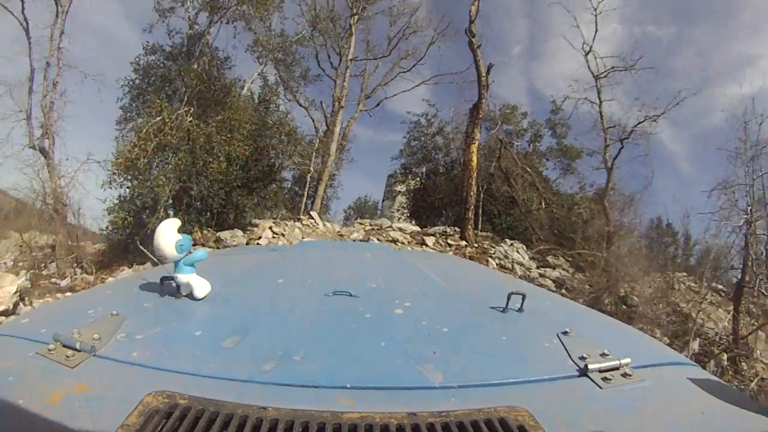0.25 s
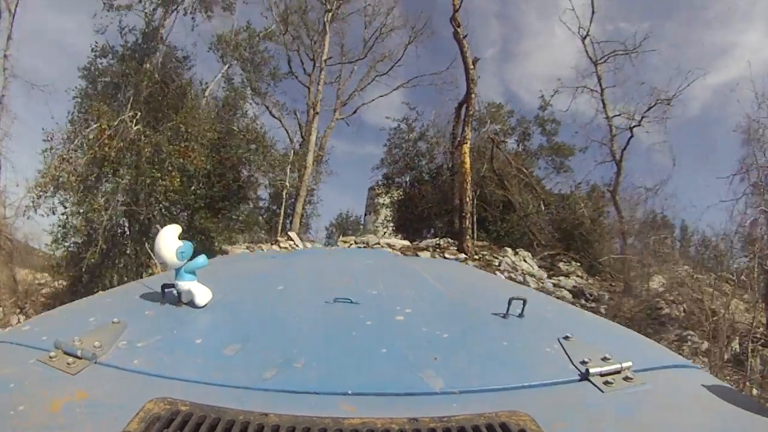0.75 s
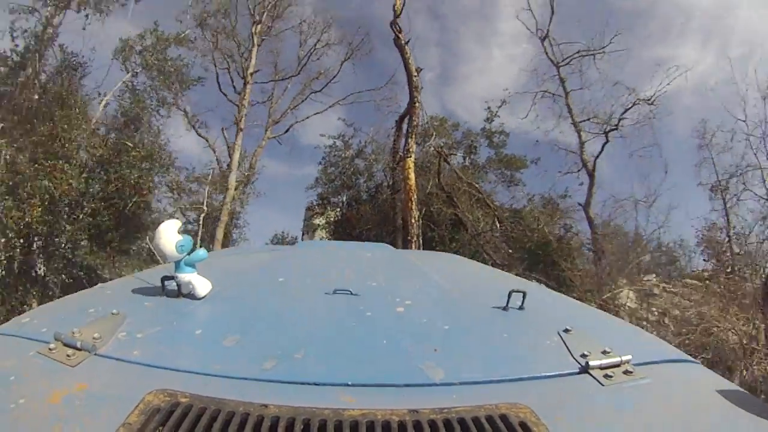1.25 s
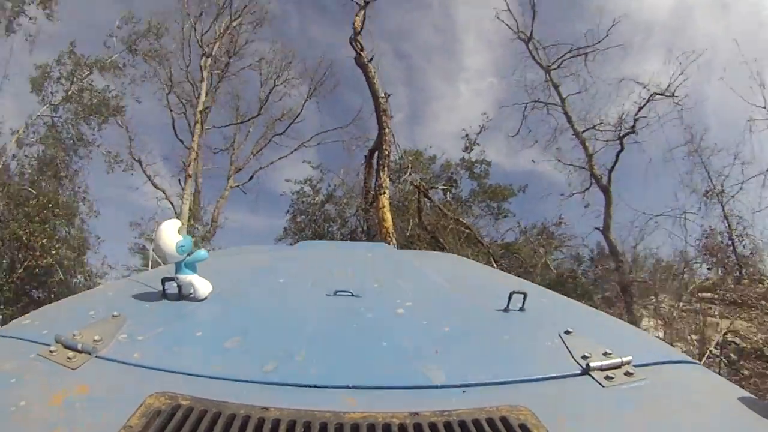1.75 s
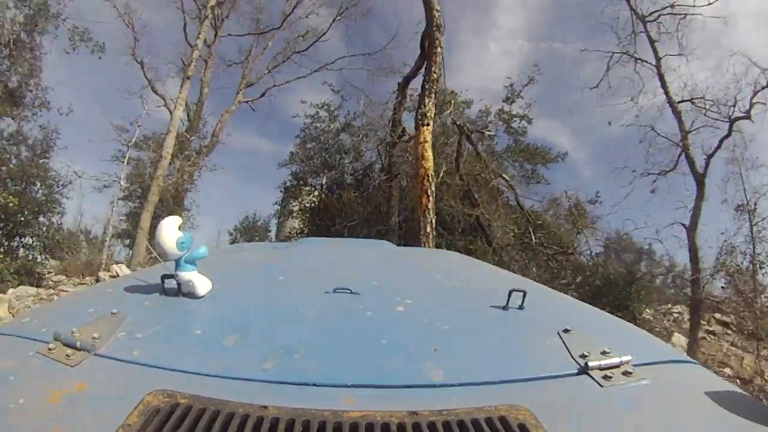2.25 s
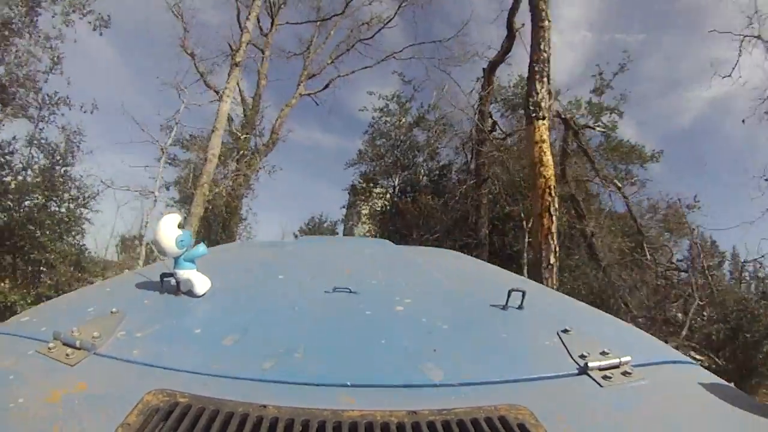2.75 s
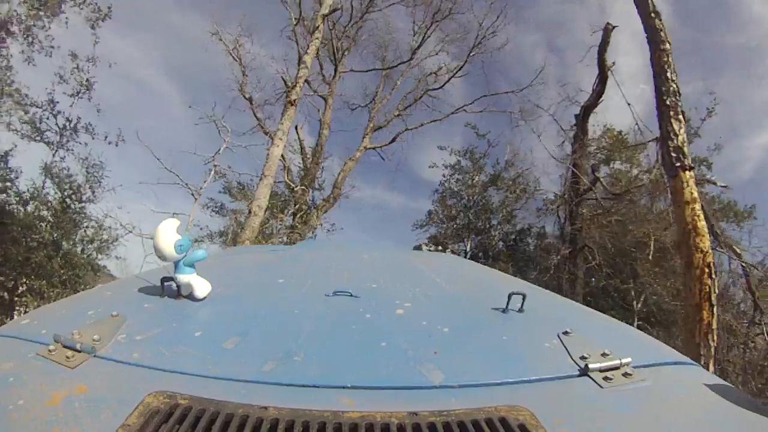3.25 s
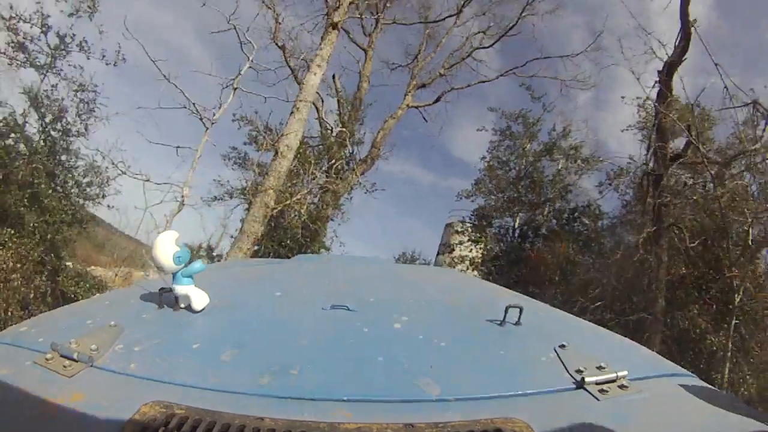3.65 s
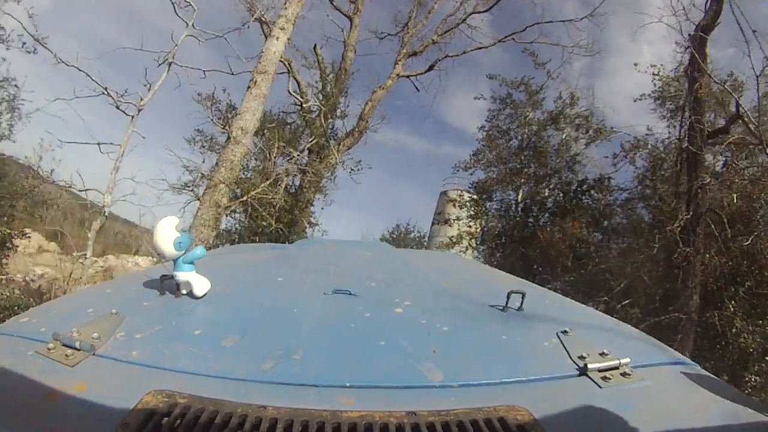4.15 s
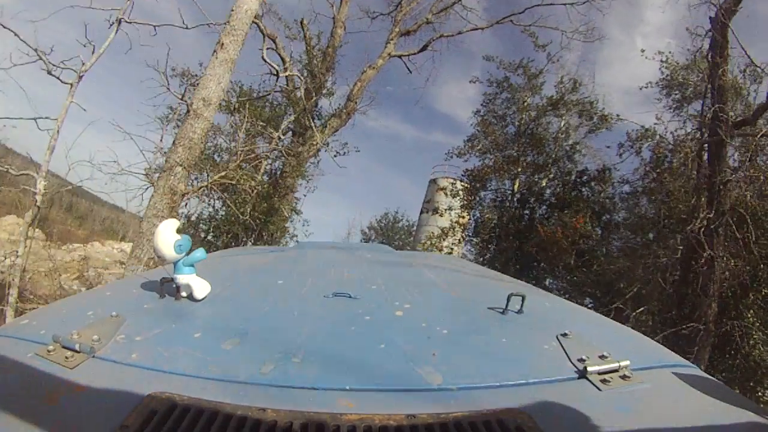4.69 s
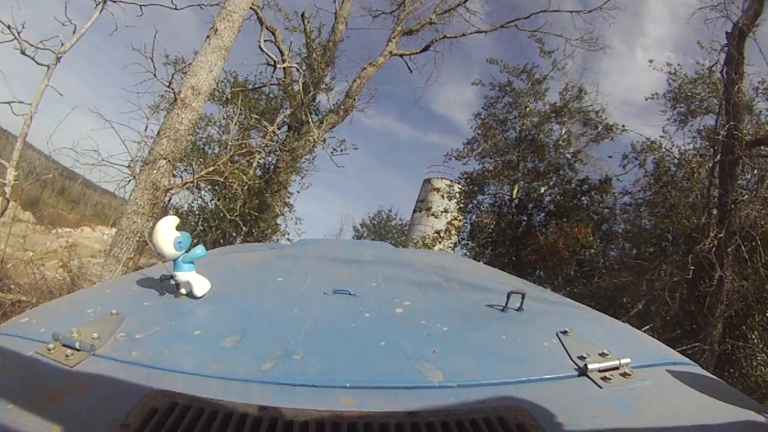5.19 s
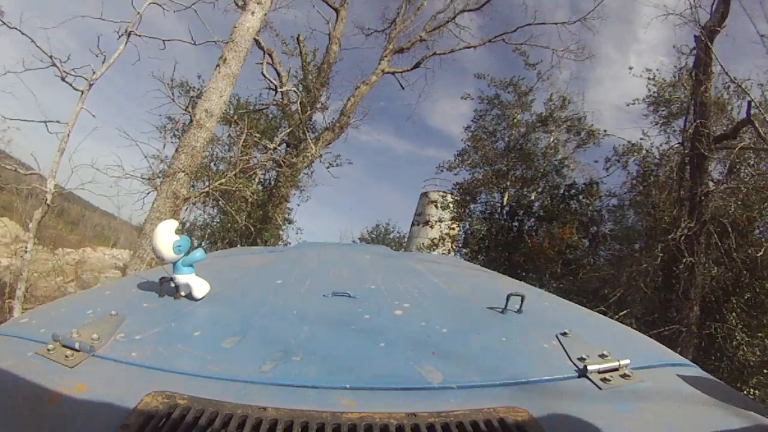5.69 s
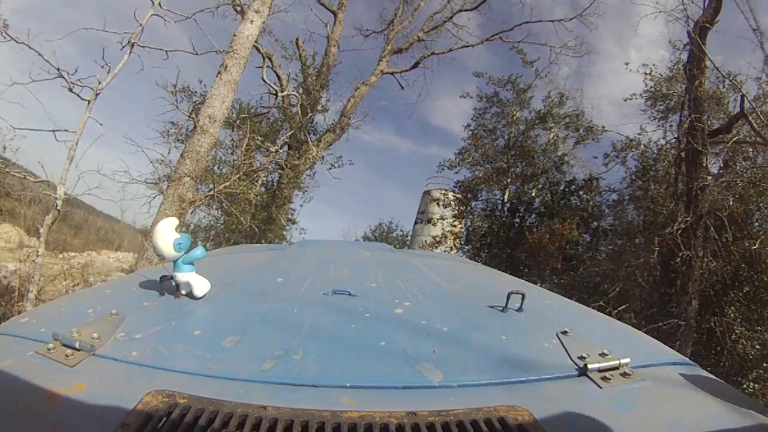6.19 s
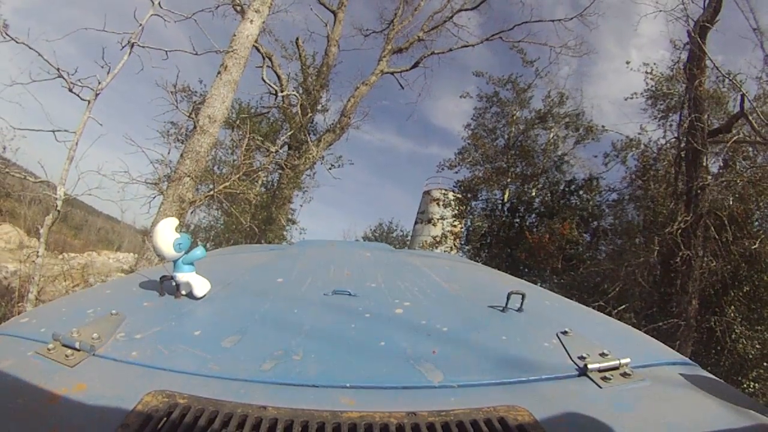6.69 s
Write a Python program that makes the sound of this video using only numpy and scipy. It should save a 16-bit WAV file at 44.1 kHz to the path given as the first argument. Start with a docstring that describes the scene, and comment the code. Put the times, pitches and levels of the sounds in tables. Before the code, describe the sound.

From the start a small truck grinds steadily, with a low wavering motor hum, coarse gear growl and gritty crunching, close and dry through its plastic body. Hollow knocks come quickly in the first half second, with a clatter of loose fittings until about 1.1 s and a low boom near 0.9. Effort dips at 1.6, recovers at 2.0, then eases. Around 2.9 to 3.2 the motor surges higher, with a sharp knock at 3.0, then bumps and short scrapes until 3.9. From 4.0 it idles quieter; rattling resumes at 4.5, with tiny high squeaks near 5. Two heavy bumps hit at about 5.4 and 5.5, followed by a hum swell at 5.65. It fades almost to silence from 6.1 to 6.45, restarts, squeaks at 6.6, judders in a slide and lands at 6.8 with a thud, crunch and scrape, then a brief faint metallic spring ring.

```python
"""A small radio-controlled truck crawls up a rocky slope, heard from on board its plastic body.
Noise grains ringing the chassis and shell make the gear grind; two wavering sines make the motor hum.
Noise and grains crunch as grit; struck tones knock on rock, and damped modes rattle as loose fittings.
The truck rolls almost to a stop, starts again, slides off a stone and lands with a thud."""
import sys
import numpy as np
from scipy import signal
from scipy.fft import rfft, irfft, next_fast_len
from scipy.io import wavfile
from scipy.ndimage import uniform_filter1d, map_coordinates

SR = 44100
rng = np.random.default_rng(int(sys.argv[2]) if len(sys.argv) > 2 else 0)


def transcribe(u):
    """Save the signal u as a 16-bit wav file named by the first command-line argument.

    u: samples, shape (n,) or (channels, n), limited to [-1, 1]; the rate is SR.
    q: integer samples, one column per channel.
    """
    v = np.clip(np.atleast_2d(u).T, -1, 1)
    q = np.round(v * 32767).astype(np.int16)
    wavfile.write(sys.argv[1], SR, q)


N = 305603


def amp(db):
    """Decibels to gain."""
    return 10 ** (np.asarray(db) / 20)


def unit(x):
    """x scaled to rms 1."""
    return x / np.sqrt(np.mean(x ** 2) + 1e-20)


def curves(rows):
    """One value per sample for each column after the time."""
    s, *cols = np.transpose(rows)
    return [np.interp(np.arange(N) / SR, s, c) for c in cols]


def wobble(rate):
    """A smooth random curve, rate knots a second."""
    knots = rng.standard_normal(int(N * rate / SR) + 4)
    return map_coordinates(knots, [np.arange(N) * rate / SR])


def filtered(x, response):
    """x times a complex response of frequency."""
    m = next_fast_len(len(x) + min(len(x), SR // 4), True)  # padded so that tails do not wrap round
    spectrum = rfft(x, m) * response(np.fft.rfftfreq(m, 1 / SR))
    return irfft(spectrum, m)[:len(x)]


def coloured(x, points):
    """x equalised through (hz, gain_db) points, joined on a log frequency axis."""
    f, db = np.transpose(points)
    return filtered(x, lambda hz: amp(np.interp(np.log(hz + 1), np.log(f), db)))


def resonate(x, modes):
    """x ringing through (hz, width_hz, gain_db) resonances of alternating sign."""
    def response(f):
        total = 0
        for k, (hz, width, db) in enumerate(modes):
            damping = 1j * f * width
            total = total + (-1) ** k * amp(db) * damping / (hz * hz - f * f + damping)
        return total
    return filtered(x, response)


def grains(rate, spread_db):
    """Random tiny impacts of uneven size, about rate a second, rms 1."""
    hits = rng.random(N) < rate / SR
    return unit(hits * rng.choice([-1, 1], N) * amp(spread_db * rng.standard_normal(N)))


def steadied(x, span):
    """x with its level evened out by two passes of a span-second average, rms near 1."""
    size = max(int(span * SR), 1)
    power = uniform_filter1d(uniform_filter1d(x * x, size), size)
    return x / np.sqrt(np.abs(power) + 1e-20)


def sine(hz):
    """A tone that follows a pitch curve, rms 1."""
    return np.sqrt(2) * np.sin(2 * np.pi * np.cumsum(hz) / SR)


def swell(t, peak, sharpness):
    """A contact's force: up to 1 at peak seconds, then away."""
    return (t / peak * np.exp(1 - t / peak)) ** sharpness


def add(track, s, sound):
    """Mix a sound into the track at s seconds."""
    part = track[max(round(s * SR), 0):][:len(sound)]
    part += sound[:len(part)]


# how hard the truck works, and how much grit is under the tread (also read by tyres):
# time_s, effort_db, grit_db
DRIVE = [(0,-38.5,-52.5),(.95,-37.5,-52.5),(1.48,-40.5,-58),(1.63,-48,-58.5),(2.0,-38.5,-56.5),(2.3,-45,-60),(2.76,-44.5,-60),(2.88,-36,-55),(3.0,-39,-46),(3.22,-39,-54.5),(3.72,-36,-52.5),(3.94,-42,-54),(4.04,-50,-66.5),(4.38,-50,-63),(4.62,-42.5,-60.5),(5.19,-47,-66.5),(5.31,-45,-60),(5.38,-36.5,-47.5),(5.47,-37,-56),(5.62,-43.5,-60.5),(5.8,-49.5,-69),(6.14,-68.5,-84),(6.42,-71,-83.5),(6.48,-51,-68.5),(6.77,-39.5,-61),(6.93,-46.5,-68.5)]
# resonances of chassis and plastic shell, both also used by knocks: pitch_hz, width_hz, gain_db
CHASSIS = [(92.4, 34, 5), (117.7, 15, -2)]
SHELL = [(157.6,55,2.5),(235.6,61.6,4),(324,76.6,0.5),(507,84,-4),(636.4,96.7,-2.5),(731.3,171,-12),(1220,250,-33.5)]
# equalisation of chassis rumble, gear grind and pebble bumps: freq_hz, gain_db
RUMBLE_TONE = [(20, -14), (45, -12), (65, -13.5), (85, -7), (125, 0), (200, -1.5), (500, -30)]
GEAR_TONE = [(50,-16.5),(110,3.5),(160,0),(720,-6),(950,6.5),(1450,-2),(3000,-53.5),(8000,-31.5)]
PEBBLE_TONE = [(150,-27.5),(330,-0.5),(680,-2),(950,1),(1400,-15),(2400,-6.5),(5000,-16.5),(10000,-23.5)]
CRUISE_DB = -40.5  # the effort of a steady climb
RUMBLE_DB, RUMBLE_GROWS = -42, 0.74  # chassis rumble at that effort; dB more for each dB of effort


def drive():
    """Gears grind into the shell, tread lugs shudder the chassis, pebbles bump the wheels; effort lifts all."""
    effort_db, _ = curves(DRIVE)
    rumble_db = RUMBLE_DB + RUMBLE_GROWS * (effort_db - CRUISE_DB)
    shudder = coloured(resonate(grains(rate=330, spread_db=5.0), CHASSIS), RUMBLE_TONE)
    teeth = coloured(resonate(grains(rate=700, spread_db=0.5), SHELL), GEAR_TONE)
    pebbles = coloured(resonate(grains(rate=55, spread_db=4), SHELL), PEBBLE_TONE)
    unsteady = amp(1.76 * wobble(12))
    grind = unsteady * steadied(teeth, span=0.022) + amp(-12.0) * unit(pebbles)
    return amp(rumble_db) * steadied(shudder, span=0.066) + amp(effort_db) * grind


# the motor's hum: time_s, pitch_hz, level_db (before trim)
HUM = [(0,92.5,-38.5),(.45,97.36,-36.5),(.85,112,-40),(1.6,92.7,-34.5),(1.8,126.5,-40),(2.05,92,-34.5),(2.65,87.96,-36),(2.78,97.4,-32),(2.89,135.7,-35.5),(2.99,150.6,-31.5),(3.17,130.5,-32),(3.27,126.3,-40),(3.45,104,-44),(3.72,92.5,-32),(4.05,89.6,-50.5),(4.46,88,-41.5),(4.75,87.65,-39),(5.25,86.75,-40.5),(5.52,96.9,-38),(5.66,97.5,-28.5),(5.76,106.7,-39),(5.92,106,-44),(6.2,99.1,-72.5),(6.5,105.2,-65),(6.7,99.1,-44),(6.93,92,-68)]


def motor():
    """A low hum and its octave follow the pitch and level curves, wavering at random."""
    hum_hz, hum_db = curves(HUM)
    speed = hum_hz * (1 + 0.018 * wobble(30))
    level = amp(hum_db - 7 + 4.06 * wobble(25))
    return level * (sine(speed) + amp(-13.0) * sine(2 * speed))


# equalisation of faint outdoor air: freq_hz, gain_db
AIR = [(25,-25),(100,-6.5),(300,-25.5),(700,-18),(1100,-32.5),(3000,-43),(12000,-42.5),(15500,-68)]


def outdoor_air():
    """Steady noise, mostly low, stands for the open air."""
    return amp(-73.5) * unit(coloured(rng.standard_normal(N), AIR))


STONES_PER_S = 60
# median pitch, its log spread, and the cycles a stone rings before falling to 1/e
STONE_HZ, STONE_SPREAD, STONE_CYCLES = 1550, .32, 5


def stones():
    """Small stones grate against each other, each with its own pitch and size, rms 1."""
    out, t = np.zeros(N), np.arange(SR // 30) / SR
    draws = rng.standard_normal((int(STONES_PER_S * N / SR), 3))
    for k, (when, pitch, size) in enumerate(draws):
        hz = STONE_HZ * np.exp(STONE_SPREAD * pitch)
        ring = np.exp(-hz * t / STONE_CYCLES) * np.sin(2 * np.pi * hz * t)
        add(out, (k + when) / STONES_PER_S, amp(3 * size) * ring)
    return unit(out)


# equalisation of sand and of larger chips: freq_hz, gain_db
GRIT_TONE = [(300,1),(900,7.5),(1400,5),(1850,2),(2300,3.5),(3200,-8.5),(4200,-1),(5800,-13),(7000,-17.5),(9900,-19.5),(12000,-29.5),(15500,-25)]
CHIP_TONE = [(500,-11.5),(1000,-6),(1400,3),(1800,-3.5),(2350,0.5),(3200,-11.5),(4300,-9),(5800,-7),(7200,-27.5),(10000,-23.5),(15000,-42)]
SAND_DB, CHIPS_DB, STONES_DB = -5.5, -7, -9  # against the grit level


def tyres():
    """Sand crackles under the tread, larger chips crumble in short bursts and small stones grate."""
    _, grit_db = curves(DRIVE)
    crackle = grains(rate=1500, spread_db=2.5) + rng.standard_normal(N)
    flutter_db = 1.4 * wobble(50)
    t = np.arange(SR // 50) / SR
    crumbles = np.abs(grains(rate=70, spread_db=3.5))
    bursts = signal.fftconvolve(crumbles, np.exp(-t / 0.008))[:N]
    chips = coloured(bursts * rng.standard_normal(N), CHIP_TONE)
    sand = amp(SAND_DB + flutter_db) * unit(coloured(crackle, GRIT_TONE))
    return amp(grit_db) * (sand + amp(CHIPS_DB) * unit(chips) + amp(STONES_DB) * stones())


# modes of the fittings, heavily damped by the body: pitch_hz, width_hz, gain_db
FITTINGS = [(2080,610,-2.5),(2310,146,-2),(2800,530,-2.5),(3860,490,3.5),(4310,360,1.5),(4910,650,-6),(5970,320,-16.5),(7900,340,-1.5),(7950,500,-3),(9780,490,-2),(10020,420,-3),(12700,1200,-3.5)]
# edges between the low, middle and top modes: edge_hz
REGISTERS_HZ = [0, 3300, 7000, 16000]
# equalisation of the contact's crack: freq_hz, gain_db
CONTACT_TONE = [(900,-10),(1700,-2.5),(2600,13.5),(3300,-5),(4500,14),(5300,-10),(6500,-8),(10000,-11.5),(15000,-19.5)]
CONTACT_DB, CONTACT_S = -12, 0.00092  # the crack against the clink; its decay time
# the buzz between the touching parts after the strike: decay time, level against the strike
CHATTER_S, CHATTER_DB = 0.0042, -19


def tap(ring_db, clink_db, tick_db):
    """A dry strike and faint buzz: a crack, then low, middle and top modes, different each time."""
    t = np.arange(SR // 50) / SR
    hz, width, db = np.transpose(FITTINGS)
    pitch = hz * (1 + .04 * rng.standard_normal(len(hz)))
    gain = amp(db + rng.normal(0, 1.85, len(hz))) * (-1) ** np.arange(len(hz))
    decay = np.exp(-np.pi * np.outer(width, t))
    modes = gain[:, None] * decay * np.sin(2 * np.pi * np.outer(pitch, t))
    chatter = amp(CHATTER_DB) * rng.standard_normal(len(t)) * np.exp(-t / CHATTER_S)
    chatter[0] = 1  # the strike itself
    crack = coloured(rng.standard_normal(len(t)) * np.exp(-t / CONTACT_S), CONTACT_TONE)
    out = amp(ring_db + clink_db + CONTACT_DB) * unit(crack)
    for level, lo, hi in zip([0, clink_db, tick_db], REGISTERS_HZ, REGISTERS_HZ[1:]):
        register = modes[(lo < hz) & (hz <= hi)].sum(0)
        ring = signal.fftconvolve(chatter, register)[:len(t)]
        out += amp(ring_db + level) * unit(ring)
    return out


# loose fittings tapping the body:
# start_s, ring_db (low modes, before trim), clink_db (middle over ring), tick_db (top over ring)
TAPS = [(0.02, -39.5, -1, -11), (0.2604, -45, 4.5, -15), (0.2773, -48.5, 0, -30),
        (0.305, -51.5, -5.5, -11.5), (0.401, -46.5, 1.5, -29), (0.455, -51.5, -8, -22),
        (0.5431, -39, 3, -15.5), (0.5504, -44, 4, -15.5), (0.5603, -48, 1.5, -21), (0.6153, -42.5, 1, -18),
        (0.6678, -47, -2, -12), (0.6758, -44, 3, -12), (0.6796, -49, 2.5, -24), (0.696, -49, -7, -14),
        (0.7277, -47, 3.5, -30), (0.8015, -44.5, -7, -14), (0.8188, -43.5, 1, -19), (0.829, -54, -9, -12),
        (0.8753, -45.5, -8, -12), (0.9405, -46, 0, -32), (0.9484, -46, 2, -18), (0.9937, -46, -10, -15),
        (1.0537, -45.5, 2, -11), (1.0585, -42, -23, -33), (1.0725, -54, 9, -17), (1.431, -47.5, -13, -22),
        (1.4475, -54, -9, -20), (1.5282, -53, -6.5, -17.5), (1.55, -39, 4, -12.5), (1.589, -54.5, 2, -14),
        (1.6315, -50, 5.5, -18), (1.6368, -59, -2, -28), (1.659, -50, 2.5, -18), (1.7222, -43, 2.5, -13.5),
        (1.7823, -49, 2, -25), (1.959, -51, -3, -9), (1.971, -58, -13, -18), (3.7528, -44, -0.5, -11),
        (3.76, -45, -2.5, -17), (3.7656, -43.5, 5.5, -10), (3.7722, -53.5, 10, -1),
        (3.8118, -55.5, 3.5, -2), (3.8443, -58, 3, -1.5), (3.9061, -45.5, 1, -13), (3.9146, -51.5, 11, -19),
        (3.9429, -49, 0, -32), (3.9592, -51, 5, -9), (4.008, -55, -5, -15), (4.0407, -57, -7, -22),
        (4.2283, -51, -1, -33), (4.241, -55, -10, -26), (4.5393, -46, -11, -23), (4.5483, -40.0, 1.5, -25),
        (4.575, -47.5, -3, -15.5), (4.6342, -50.5, -9, -18), (4.659, -66, -5, -22),
        (4.6888, -52.5, -7, -19), (4.7079, -53, -8, -25), (4.715, -47.5, -6, -20), (4.739, -47, -5, -29),
        (4.7522, -56, -5, -20), (4.7671, -52, -11, -24), (4.7748, -54, -8, -23), (4.81, -48, -5.5, -20),
        (4.82, -47.5, 4.5, -19.5), (4.8358, -48, -9, -22), (4.8836, -50.5, -6, -21.5),
        (4.8904, -39, 3.5, -15.5), (4.8998, -50.5, -1, -16), (4.9524, -47.5, -4, -14),
        (4.9688, -56.5, 1, -7), (5.0199, -47.5, -5.5, -16), (5.0403, -53.5, -2.5, -11),
        (5.1068, -52.5, -7, -17), (5.1689, -60, 1, -13), (5.207, -44.5, -7.5, -21), (5.2267, -51, -3, -15),
        (5.2542, -40, -3, -18), (5.28, -43, -7, -28), (5.286, -50, -1, -13), (5.3103, -39, -4.5, -15.5),
        (5.3156, -45.5, -2.5, -24), (5.586, -53.5, -8, -20), (5.6508, -55, -13, -26)]
# spells in which the fittings also jiggle softly: start_s, end_s
JIGGLES = [(0.499, 1.11), (1.518, 1.7), (3.78, 3.96), (4.528, 4.78)]
# equalisation of all taps: freq_hz, gain_db
TAP_TONE = [(600,-25.5),(1800,1),(2800,1.5),(3350,-13.5),(3900,1.5),(10600,-2),(11600,-6),(15000,-8)]
JIGGLE_PER_S, JIGGLE_DB = 26, -53.5  # mean low ring, before the trim shared with the taps


def rattle():
    """Loose metal fittings chatter against the body in clusters, and in some spells jiggle at random."""
    out = np.zeros(N)
    for s, ring_db, clink_db, tick_db in TAPS:
        add(out, s, tap(ring_db, clink_db, tick_db))
    for start, end in JIGGLES:
        for s in np.arange(start, end, 1 / JIGGLE_PER_S):
            scatter_db = rng.uniform(-5, 5)
            jiggle = tap(JIGGLE_DB + scatter_db, clink_db=-1, tick_db=-18.5)
            add(out, s + rng.random() / JIGGLE_PER_S, jiggle)
    return amp(-6) * coloured(out, TAP_TONE)


# wheels striking rock, levels before trim:
# start_s, shell_hz, ring_db, upper_db (second tone over the first), thud_db (chassis), crunch_db
KNOCKS = [(0.09,323,-27.5,-2.5,-31.5,-42),(0.183,325,-31,-15,-34,-71),(0.239,327,-20,-3.5,-45,-34),(0.384,346,-31,-5.5,-38,-44),(0.448,312,-30,0,-42,-41),(0.597,315,-32.5,0.5,-55,-61),(0.917,319,-34,-1,-26.5,-37.5),(1.207,335,-27,-1.5,-38,-41.5),(1.422,338.5,-22,-12.5,-34,-37),(1.516,332.5,-29,-15,-34.5,-46),(1.978,338,-30.5,-34,-35,-50),(2.234,336,-29.5,-5,-36.5,-56),(2.419,348,-34,-7.5,-33,-58),(2.63,335,-37,-5,-47,-65),(3.003,326,-18.5,-6,-33,-32.5),(3.0155,310.6,-31,-2,-34,-35),(3.094,302,-38,-6,-33,-54),(3.299,302,-27,-1.5,-32.5,-40),(3.373,336.6,-28,0,-30,-47),(3.409,336,-30.5,-27,-31,-43),(3.594,335,-27,-16,-38,-35.5),(3.694,360,-25,-3,-48,-35.5),(3.744,331,-21,-10,-39,-33),(3.884,320,-28,-4.5,-31,-44.5),(4.512,332.5,-27,-11,-37,-42.5),(4.533,323,-32,-8.5,-30,-61),(4.727,339,-33.5,2,-37,-63),(4.877,334,-27.5,-7.5,-33,-46),(5.018,290,-49.5,10,-34.5,-40),(5.256,288,-41.5,5.5,-45,-42),(5.362,360,-30,0,-28,-30),(5.389,335,-26,-22,-36,-53),(5.416,327.4,-32,-18,-35,-42),(5.4816,290,-34,-7,-27.5,-44),(6.8,301.5,-23.5,-2.5,-34.5,-32),(6.812,361,-28,-2.5,-50,-43)]
# the stiff deck's resonances: pitch_hz, width_hz, gain_db
CLACK = [(1030, 560, -4), (1430, 56, 9.5), (1790, 220, -11.5), (2160, 61, -3)]
# equalisation of thud and of crushed grit: freq_hz, gain_db
THUD_TONE = [(60, -45), (110, 3.5), (175, 6.5), (240, 14.5), (330, -7.5), (600, -62.5)]
CRUNCH_TONE = [(400,-6),(900,6),(1400,3),(1850,0),(2300,2),(3100,-12.5),(4300,-8),(7000,-29.5),(15000,-39.5)]
UPPER_RATIO = 1.92  # the shell's second tone against its first
CLACK_DB = -7  # gain of the deck's clack, driven by the crunch envelope
LEAD_S, LEAD_DB = 0.0082, -16  # the tyre squashes this long before each blow; its stir against ring_db


def knocks():
    """Each tyre-softened blow rings two shell tones, clacks the deck, bounces the chassis, crushes grit."""
    out, t = np.zeros(N), np.arange(SR // 5) / SR
    low_ring = swell(t, peak=0.0056, sharpness=1.0) + 0.13 * swell(t, peak=0.027, sharpness=6.1)
    high_ring = swell(t, peak=0.0021, sharpness=0.34)
    bounce = swell(t, peak=0.029, sharpness=0.52) * np.sin(2 * np.pi * CHASSIS[0][0] * t)
    # level envelopes, filled with noise below
    pushes, crunches, jolts = np.zeros((3, N))
    for s, hz, ring_db, upper_db, thud_db, crunch_db in KNOCKS:
        upper_level_db = ring_db + upper_db
        add(out, s, amp(ring_db + 2.0) * low_ring * np.sin(2 * np.pi * hz * t))
        add(out, s, amp(upper_level_db) * high_ring * np.sin(2 * np.pi * UPPER_RATIO * hz * t))
        add(out, s, amp(thud_db - 10.0) * bounce)
        add(jolts, s, amp(upper_level_db - 8.0) * swell(t, peak=0.0054, sharpness=0.16))
        add(jolts, s - LEAD_S, amp(ring_db + LEAD_DB) * swell(t, peak=LEAD_S, sharpness=1.4))
        add(pushes, s, amp(thud_db - 1.5) * swell(t, peak=0.01, sharpness=0.82))
        add(crunches, s, amp(crunch_db - 7.0) * swell(t, peak=0.0042, sharpness=0.39))
    judder_tone = [(150, -20.0), (400, -1.5), (700, -2.0), (1500, -2.0), (3000, -30.0)]
    judder = steadied(coloured(resonate(rng.standard_normal(N), SHELL), judder_tone), span=0.0073)
    thud = steadied(coloured(rng.standard_normal(N), THUD_TONE), span=0.055)
    crunch = steadied(coloured(grains(rate=2100, spread_db=-0.5), CRUNCH_TONE), span=0.0018)
    clack = steadied(resonate(grains(rate=550, spread_db=5.0), CLACK), span=0.008)
    body = coloured(out + jolts * judder + pushes * thud, [(2500, -0.5), (8000, -22.5)])
    return body + crunches * (amp(-1.0) * crunch + amp(CLACK_DB) * clack)


# short squeaks of tyres and drivetrain:
# middle_s, pitch_hz, level_db (before trim), length_s (Gaussian half length), glide_hz_per_s
SQUEAKS = [(0.142,955,-43,.008,-2000),(0.777,1150,-41,0.0056,3000),(1.69,1220,-46.5,0.006,8002),(2.15,1620,-55,0.01,0),(4.675,1746,-65,0.015,500),(4.985,1860,-62,0.025,-1500),(5.067,1740,-52,0.018,2000),(5.164,1834,-56,0.018,1500),(5.746,1640,-62,0.046,1506),(5.86,1852,-62,0.023,794),(5.951,1855,-63,0.022,308),(6.106,1690,-74.5,.026,-500),(6.589,1433,-50.5,0.02,604)]
SQUEAK_WAVER_HZ = 42  # unsteadiness of a squeak's pitch


def squeaks():
    """Rubber or a dry joint sticks and slips: a short wavering, gliding tone in a band of rubbing noise."""
    out, t = np.zeros(N), np.arange(-SR // 10, SR // 10) / SR
    waver, flutter = SQUEAK_WAVER_HZ * wobble(200), wobble(150)
    for s, hz, db, length, glide in SQUEAKS:
        at = round(s * SR) + np.arange(len(t)) - len(t) // 2
        tone = sine(hz + glide * t + waver[at])
        rub = unit(resonate(rng.standard_normal(len(t)), [(hz, 260, 0)]))
        grip = amp(db - 9 + 2.5 * flutter[at]) * np.exp(-(t / length) ** 2 / 2)
        add(out, s + t[0], grip * (tone + amp(-8) * rub))
    return out


# stone chips snapping under a tyre: start_s, level_db (before trim)
SNAPS = [(.2445, -50), (0.543, -38), (1.551, -34.5), (6.8121, -34.5)]
# equalisation of the snaps: freq_hz, gain_db
SNAP_TONE = [(2000, -2), (6000, -14), (9500, 4), (12000, -17), (15000, -16)]


def snaps():
    """Brittle chips break with a very short, bright tick of decaying noise."""
    out, t = np.zeros(N), np.arange(SR // 200) / SR
    for s, db in SNAPS:
        tick = rng.standard_normal(len(t)) * np.exp(-t / 0.00036)
        add(out, s, amp(db - 8.5) * unit(tick))
    return coloured(out, SNAP_TONE)


# tyres slipping on stone: peak_s, level_db, fall_s, brightest_hz
SCRAPES = [(0.91,-46.5,0.012,5260),(3.076,-52,0.0056,6050),(3.481,-45,0.012,5770),(3.661,-52,0.022,4944),(3.833,-47.5,0.0071,6200),(4.432,-59,0.019,5640),(5.022,-55,0.0098,5400),(5.339,-53,0.008,5780),(5.535,-59.5,0.048,2358),(6.28,-80,0.032,2500),(6.475,-64,0.0075,5540),(6.789,-38,0.015,4670)]
SCRAPE_RISE = 0.69  # rise time over fall time


def scrapes():
    """A slipping tyre rasps over fine grit up to a peak and grips again."""
    out, t = np.zeros(N), np.arange(-SR // 6, SR // 6) / SR
    for s, db, fall, hz in SCRAPES:
        sand = rng.standard_normal(len(t)) * amp(6.0 * rng.standard_normal(len(t)))
        tone = [(200, -14), (hz / 4, -4), (hz / 2, -6), (hz, 0), (hz * np.sqrt(2), -13), (15000, -30)]
        rasp = unit(coloured(sand, tone))
        envelope = np.exp(-np.maximum(-t / (SCRAPE_RISE * fall), t / fall))
        add(out, s + t[0], amp(db) * rasp * envelope)
    return out


# the suspension bottoming out: start_s, rocking_db (chassis), boom_db (floor pan), panel_db (side panel)
THUMPS = [(0.916,-28,-21.5,-38),(5.371,-29.5,-22.5,-32),(5.480,-23.5,-20,-23),(5.757,-28,-34.5,-65),(6.646,-40,-31,-59),(6.699,-41,-29,-57),(6.797,-19,-21.5,-30.5)]
# the parts that it shakes, in the same order: pitch_hz, peak_s (time to the peak), sharpness (of the swell)
FRAME = [(96.9, 0.027, 1.67), (207.4, 0.0096, 2.4), (510, 0.0064, 1.3)]


def thumps():
    """The suspension bottoms out: side panel and floor pan boom briefly, then the chassis rocks."""
    out, t = np.zeros(N), np.arange(SR // 4) / SR
    for s, *levels in THUMPS:
        for db, (hz, peak, sharpness) in zip(levels, FRAME):
            add(out, s, amp(db) * swell(t, peak, sharpness) * np.sin(2 * np.pi * hz * t))
    return out


# resonances of the juddering tread and of the springs: pitch_hz, width_hz, gain_db
SKID = [(168, 40, -4.5), (193, 75, 5.5)]
SPRING = [(4250, 530, 0), (4700, 140, -1.5)]
# equalisation of the dust: freq_hz, gain_db
HISS_TONE = [(1500, -6.5), (5000, -2.5), (10000, -2), (12500, -6), (15000, -4)]
SLIP_S, LAND_S = 6.61, 6.8  # the slide off the last stone
DUST_DB = -71.5  # dust while slipping
RUSH_DB, RUSH_S = -50.5, 0.011  # extra dust peaking at the landing; its rise and fall time
SKID_DB, SKID_GROWS_DB_PER_S = -38.5, 44  # judder reached as the landing nears, before its rush
SPRING_DB, SPRING_DB_PER_S = -66, 60  # springs at the landing, and how fast they fade


def slide():
    """The tread judders and dust hisses as the tyres slip; after the landing the springs sing on."""
    t = np.arange(N) / SR - LAND_S
    after = np.maximum(t, 0)
    slip_start = SLIP_S - LAND_S
    slipping = np.interp(t, [slip_start - .09, slip_start, 0, .04], [0, 1, 1, 0])
    rush = np.exp(-np.abs(t) / RUSH_S)
    hiss = unit(coloured(rng.standard_normal(N), HISS_TONE))
    dust = (amp(DUST_DB) * slipping + amp(RUSH_DB) * rush) * hiss
    skid_tone = [(60, -21), (150, 12.0), (240, 5.0), (700, -33)]
    judder = steadied(coloured(resonate(rng.standard_normal(N), SKID), skid_tone), span=0.026)
    skid = amp(SKID_DB + SKID_GROWS_DB_PER_S * t) * (slipping + 5.8 * rush) * judder
    singing = unit(resonate(rng.standard_normal(N), SPRING))
    springs = (t > 0) * amp(SPRING_DB - SPRING_DB_PER_S * after) * singing
    return dust + skid + springs


def scene():
    """The truck over faint outdoor air, as one channel."""
    rolling = drive() + motor() + tyres() + outdoor_air()
    impacts = rattle() + knocks() + snaps() + thumps()
    friction = squeaks() + scrapes() + slide()
    return (rolling + impacts + friction)[None]


TOP_HZ = 15500


def record(dry):
    """A sharp band limit removes everything from TOP_HZ up."""
    return filtered(dry[0], lambda hz: hz < TOP_HZ)[None]


dry = scene()
out = record(dry)
transcribe(out)
```